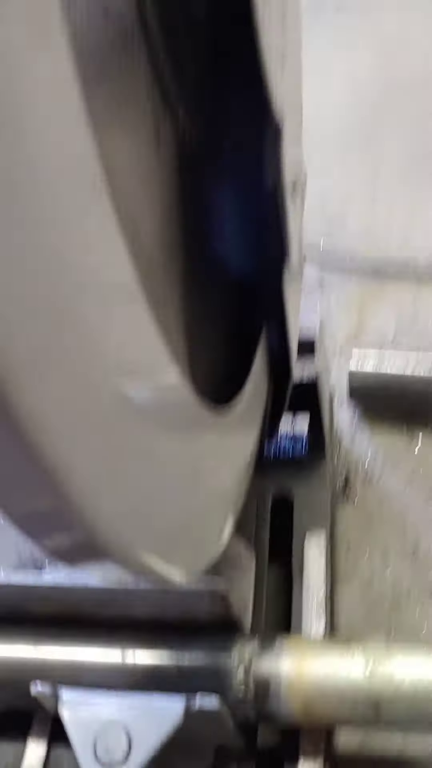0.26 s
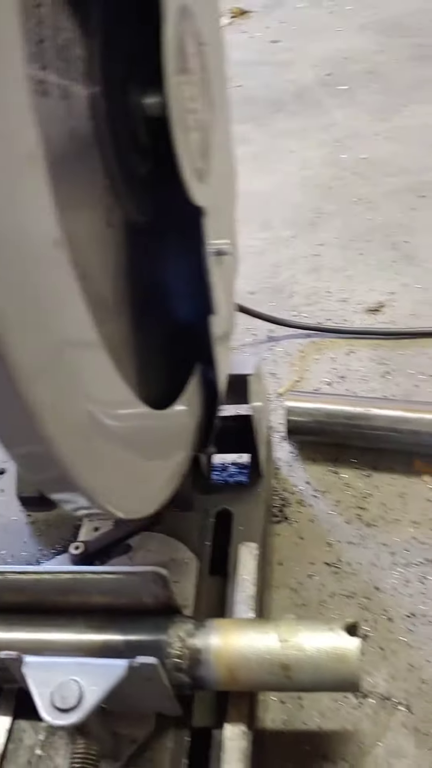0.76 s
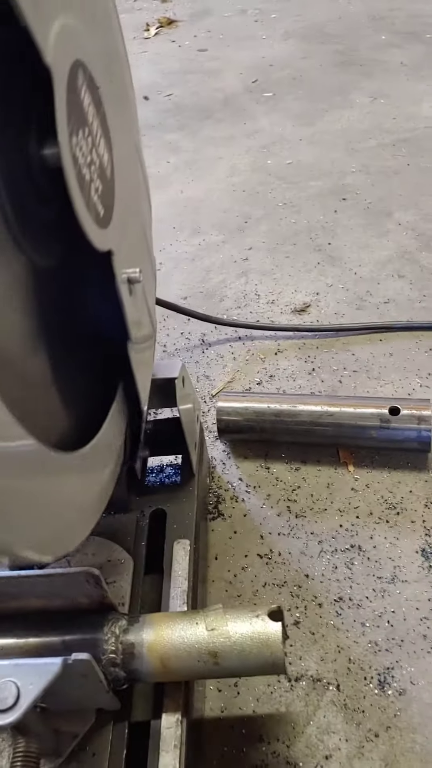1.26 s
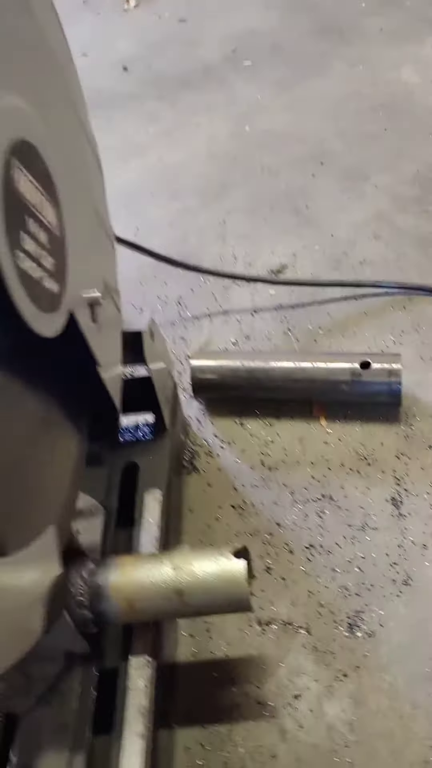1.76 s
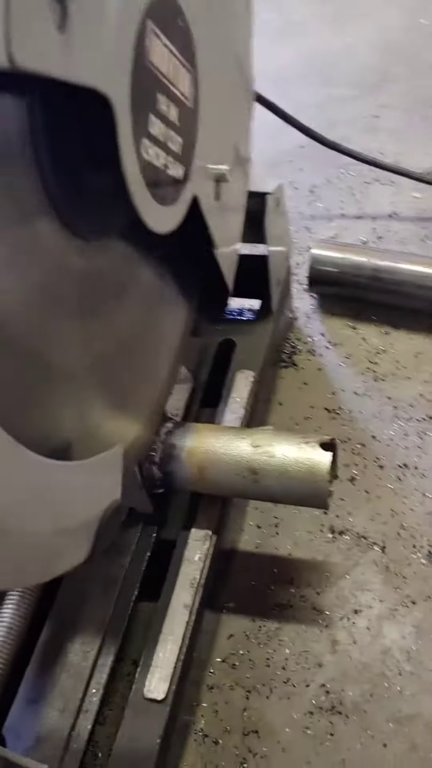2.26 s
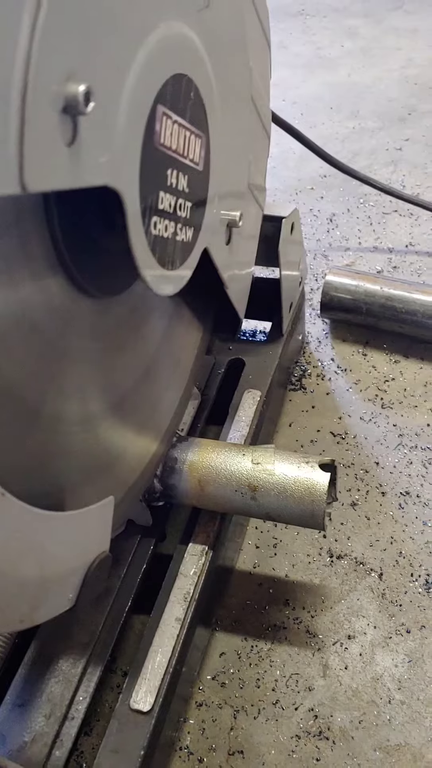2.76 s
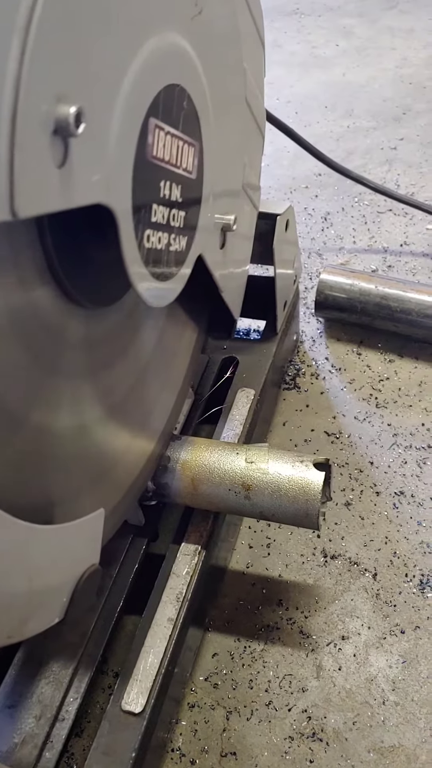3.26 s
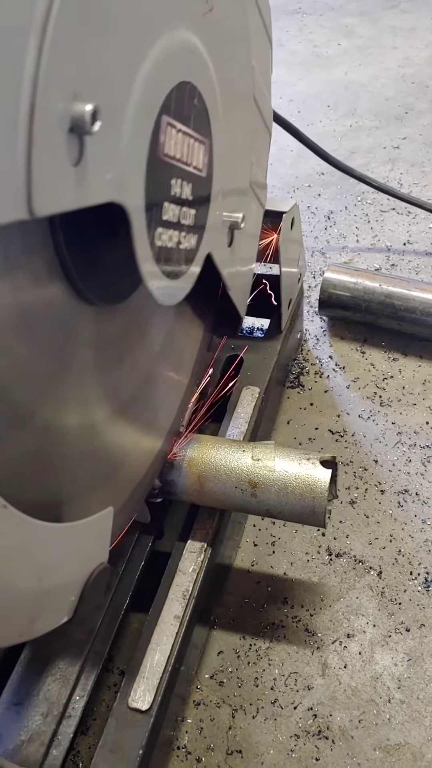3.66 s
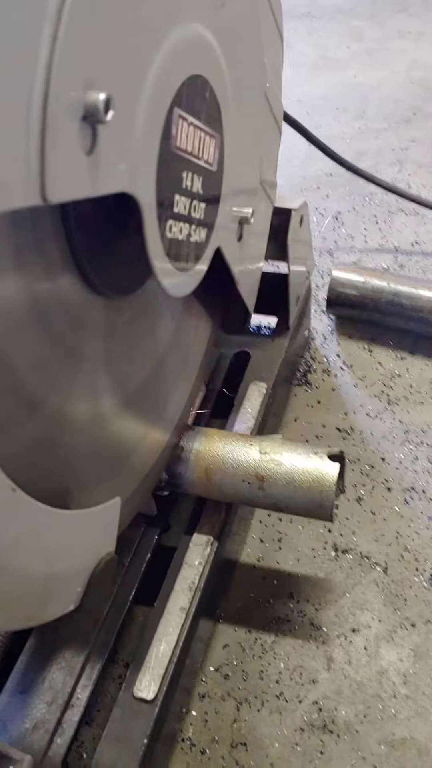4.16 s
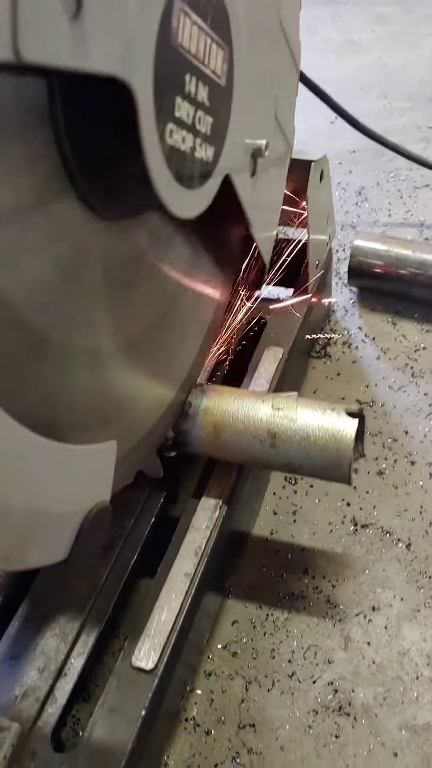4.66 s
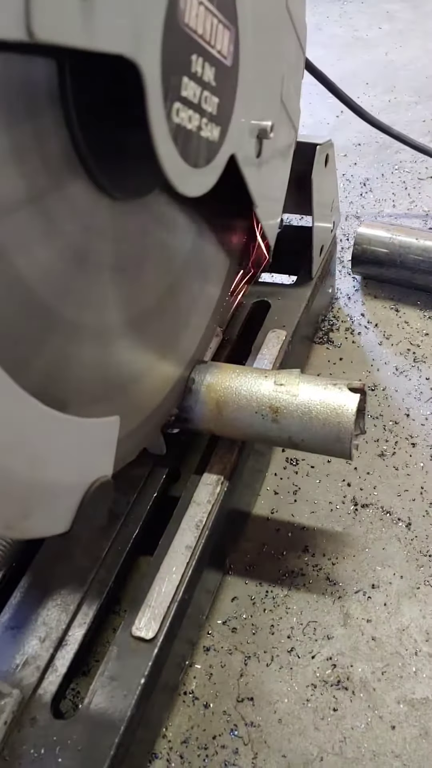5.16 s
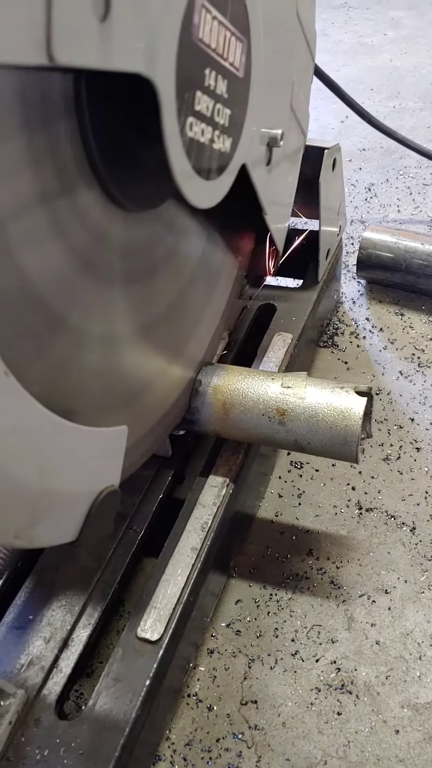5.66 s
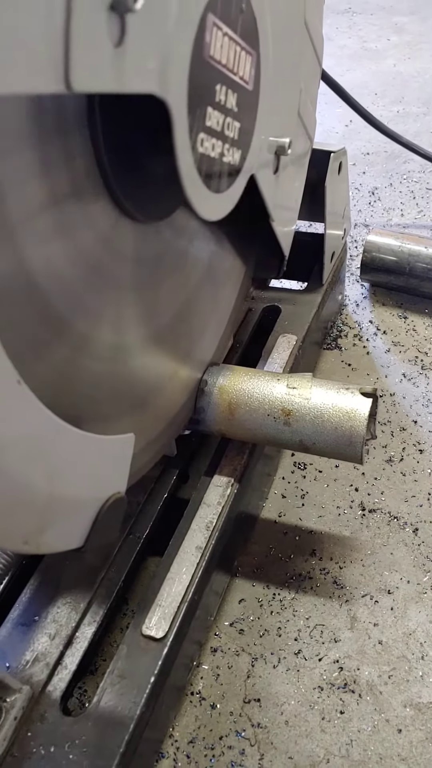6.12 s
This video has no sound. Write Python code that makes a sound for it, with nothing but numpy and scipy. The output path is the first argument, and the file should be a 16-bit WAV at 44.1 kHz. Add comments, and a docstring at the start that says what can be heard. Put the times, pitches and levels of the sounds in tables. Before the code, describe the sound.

Faint handling rumble and dry ticks, then a metal-cutting saw jolts on, whines up to speed, grazes steel and screams loudly through the tube to the end.

```python
"""Close to a dry-cut chop saw in a workshop: band-shaped noise makes a faint room tone and the rumble of fingers
on a hand-held phone, and noise bursts make dry ticks, the last the trigger. A decaying noise jolt starts the
geared motor; its sine orders whine up to speed over noise bands of roar, chatter and hiss. Soon the rim knocks
once a blade turn. The teeth graze a steel tube and the whine sags and thins. As the cut grows loud the stereo
narrows to almost mono, and noise through blade resonances screams to the end."""
import sys
import numpy as np
from scipy import signal
from scipy.fft import rfft, irfft, next_fast_len
from scipy.io import wavfile
from scipy.ndimage import uniform_filter1d, map_coordinates

SR = 44100
rng = np.random.default_rng(int(sys.argv[2]) if len(sys.argv) > 2 else 0)


def store_pcm(level_fs):
    """Save levels as 16-bit WAV."""
    pcm = np.round(np.clip(level_fs, -1, 1) * 32767).astype(np.int16)
    wavfile.write(sys.argv[1], SR, np.atleast_2d(pcm).T)


def field_ratio(decibels):
    """Amplitude ratio for a level in dB (20 dB per decade); scalars and array-likes work."""
    return 10 ** (np.asarray(decibels, dtype=float) / 20)


N = 281799
STEP = 16  # points between knots of slow curves: samples in time, bins in frequency
FREE_HZ = 384.7  # rotor turns a second without load
KNOCK_FROM_S = 1.98  # the rim starts to tap the guard


def unit(x):
    """Scales a signal to rms 1."""
    return x / np.sqrt(np.mean(x ** 2) + 1e-20)


def along(points, hz):
    """Reads (f/Hz, value) points on a log frequency axis."""
    f, v = np.transpose(points)
    return np.interp(np.log(hz + 1), np.log(f + 1), v)


def curves(rows):
    """Gives one value per sample for each column after the time."""
    s, *cols = np.transpose(rows)
    return [np.interp(np.arange(N) / SR, s, c) for c in cols]


def levels(rows, rise, fall):
    """Gain curves that fade in before the first row and out after the last (rise and fall in s)."""
    t = np.arange(N) / SR
    fade_in = np.clip((t - rows[0][0]) / rise + 1, 0, 1)
    fade_out = np.clip((rows[-1][0] - t) / fall + 1, 0, 1)
    return [field_ratio(db) * fade_in * fade_out for db in curves(rows)]


def wobble(rate):
    """A smooth random curve, rate knots a second."""
    at = np.arange(0, N + STEP, STEP)
    knots = rng.standard_normal(int(N * rate / SR) + 4)
    return np.interp(np.arange(N), at, map_coordinates(knots, [at * rate / SR]))


# How alike the two sides of a noise are: f/Hz, left-right likeness [0..1]
LIKENESS = [(700, 0.66), (1100, 0.54), (2200, 0.085), (3500, 0.19)]


def noise(spectrum, modes=(), ring_db=0, width_hz=30, patchy_db=3.5):
    """Stereo noise, its centre at rms 1, that rings the modes, with drifting patches of gain."""
    _, _, z = signal.stft(rng.standard_normal((2, N)), SR, nperseg=2048)
    field = uniform_filter1d(rng.standard_normal(z.shape[1:]), size=4, axis=0)
    field = uniform_filter1d(field, size=6, axis=1)
    pair = signal.istft(z * field_ratio(patchy_db * unit(field)), nperseg=2048)[1][:, :N]

    m = next_fast_len(N + 8192)
    hz = np.fft.rfftfreq(m, 1 / SR)
    near = hz[::STEP]
    power = np.ones(len(near))
    for centre, db in modes:
        width = width_hz * np.sqrt(centre / 2000)  # width_hz holds at 2 kHz
        power = power + field_ratio(db + ring_db) ** 2 / (1 + (2 * (near - centre) / width) ** 2)
    ringing = np.sqrt(np.interp(hz, near, power))

    side_gain = np.tan(np.arccos(np.clip(along(LIKENESS, hz), -1, 1)) / 2)
    gain = field_ratio(along(spectrum, hz)) * ringing * [np.ones(len(hz)), side_gain]
    mid, side = irfft(rfft(pair, m) * gain, m)[:, :N]
    left, right = mid + side, np.roll(mid - side, 10)  # sound reaches the right port 10 samples later
    return np.array([left, right]) / np.std((left + right) / 2)


# Spectrum of the room tone: f/Hz, relative level/dB
SHOP_SPECTRUM = [(90, -7), (150, -2), (434, -5.5), (4310, -27), (7200, -28.5), (8500, -60)]


def shop():
    """Faint steady workshop noise, stronger at the right port."""
    return field_ratio(-57 + 0.6 * wobble(7.0)) * noise(SHOP_SPECTRUM) * field_ratio([[-2.4], [2.4]])


# Fingers shifting on the phone: t/s, level/dB before the port balance
GRIP = [(0, -44), (.08, -50), (.125, -25), (.165, -21.5), (.2, -44), (.33, -53), (.5, -47), (.86, -44.5)]


def grip_rumble():
    """Fingers rub the phone's case, which passes on mostly low rumble, stronger at the right port."""
    rumble, = levels(GRIP, rise=0.01, fall=0.013)
    spectrum = [(30, -4.0), (80, -6.0), (300, -24), (1500, -48), (4000, -92)]
    return rumble * noise(spectrum) * field_ratio([[-8], [5]])


# Small dry ticks, the last the trigger: t/s, relative level/dB, relative low level/dB, relative high level/dB
HAND_TICKS = [(0.15, -19, 0, -41), (0.186, -26.5, -1, -27), (0.252, -32, -7, -15), (0.294, -29, -2, -26),
              (0.403, -35, -12, -30), (0.467, -32, -23, -20), (0.487, -24.5, -27, -18),
              (0.693, -32.5, -19, -7), (0.741, -24.5, -9, -38), (0.781, -25.5, -28, -18),
              (0.802, -26, 1, -35), (0.831, -21, -15, -25), (0.875, -22, -14, -14)]


def ticks():
    """Trigger and hand tick: short coloured bursts that ring small steel parts near 3.9 kHz."""
    t = np.arange(SR // 10) / SR
    hz = np.fft.rfftfreq(len(t), 1 / SR)
    steel = 1 + field_ratio(4.5) / (1 + ((hz - 3930) / 250) ** 2)
    decay = field_ratio(-60 * t / 0.022) + field_ratio(-17.0 - 60 * t / 0.27)  # tick, then the shop's answer (T60 in s)
    out = np.zeros((2, N + len(t)))
    for s, db, low_db, high_db in HAND_TICKS:
        spectrum = [(150, -21), (700, low_db + 15.5), (3800, -9.5), (6500, high_db), (9000, high_db - 30)]
        colour = field_ratio(along(spectrum, hz)) * steel
        burst = unit(irfft(rfft(rng.standard_normal((2, len(t)))) * colour))
        start = round(s * SR)
        out[:, start:start + len(t)] += field_ratio(db - 10.5) * burst * decay * field_ratio([[-2.2], [2.2]])
    return out[:, :N]


def rotor_speed():
    """Rotor turns a second: a long-tailed run-up to free speed, then a sag as the teeth touch."""
    t = np.arange(N) / SR
    start_s, run_up_s, shape = 0.892, 0.3217, 0.613
    load_s, sag_hz_per_s, sag_s = 3.25, 30, 1.1
    run_up = (np.clip(t - start_s, 0, None) / run_up_s) ** shape
    return FREE_HZ * (1 - np.exp(-run_up)) - sag_hz_per_s * np.clip(t - load_s, 0, sag_s)


def rotor_turns():
    """Turns made by the rotor up to each sample."""
    return np.cumsum(rotor_speed()) / SR


def blade_turns(turns):
    """The gear turns the blade once for 14 rotor turns."""
    return turns / 14


def blade_throb(turns):
    """The running blade throbs once a turn."""
    return np.cos(2 * np.pi * blade_turns(turns))


def running():
    """The motor's noise switches on, then is turned down quickly by the phone from 3.53 s."""
    t = np.arange(N) / SR
    on_s, turn_down_s, turn_down_db_per_s = 0.885, 3.53, 182
    switch_on = np.clip((t - on_s) / 0.012 + 1, 0, 1)
    return switch_on * field_ratio(-turn_down_db_per_s * np.maximum(t - turn_down_s, 0))


# Resonances of the blade guard: f/Hz, level/dB over the broad spectrum before each layer's ring_db
GUARD_MODES = [(420, 3.5), (510, 12), (910, 8.5), (1000, 9), (1440, 7), (2880, 15.5), (4620, 12)]


def start_jolt():
    """The start jolts the guard into a rattle that dies by 32 dB a second."""
    t = np.arange(N) / SR
    since = t - 0.88
    jolt = (since > 0) * field_ratio(-9.5 - 32 * since + 1.8 * wobble(60))
    spectrum = [(250, -15.5), (400, 6.5), (520, -8.5), (1500, -5.5), (2000, -53)]
    return jolt * noise(spectrum, GUARD_MODES, ring_db=5.5, width_hz=75, patchy_db=0.6)


# Brush noise spectrum: f/Hz, relative level/dB
BRUSH_SPECTRUM = [(2600, -5.5), (3400, 3), (5400, -3), (6640, 5.5), (7780, -13), (10700, -7), (11800, -16)]
# Brushes chattering, worst in the run-up: t/s, level/dB before flutter
CHATTER_LEVEL = [(.91, -33.5), (1.15, -29), (1.74, -26), (1.82, -42), (3.5, -33.5)]
# Resonance of the brush holders: f/Hz, level/dB over the hiss
HOLDER_MODES = [(6570, 15)]


def brush_chatter():
    """Brushes chatter in their holders and ring them."""
    chatter = levels(CHATTER_LEVEL, rise=0.017, fall=0.085)[0] * field_ratio(2.8 * wobble(75))
    return chatter * noise(BRUSH_SPECTRUM, HOLDER_MODES, width_hz=94)


# Brush hiss before flutter and the turning down: t/s, level/dB
HISS_LEVEL = [(.885, -31), (1.15, -22.5), (1.75, -22), (1.85, -23.5), (3.2, -21)]


def brush_hiss_and_knock(turns):
    """The brushes hiss in bursts; later the rim also taps the guard once a blade turn."""
    t = np.arange(N) / SR
    hiss = running() * field_ratio(curves(HISS_LEVEL)[0])
    flutter = field_ratio(0.47 * blade_throb(turns) + 1.4 * wobble(90))
    brushes = flutter * noise(BRUSH_SPECTRUM, GUARD_MODES, ring_db=-7.5, width_hz=420, patchy_db=4.0)

    since_tap = (blade_turns(turns) + 0.15 * wobble(5.9)) % 1  # in turns, with uneven timing
    knock = (t > KNOCK_FROM_S) * field_ratio(3 - 30 * since_tap + 1.4 * wobble(16))  # falls 30 dB over one turn
    spectrum = [(700, -30), (1800, 1), (2900, 18), (6000, -12), (9000, -26)]
    taps = knock * noise(spectrum, GUARD_MODES + [(2420, 7.6)], width_hz=110, patchy_db=-1.3)
    return hiss * (brushes + taps)


# Roar of fan and gears: f/Hz, relative level/dB
ROAR_SPECTRUM = [(25, -39), (150, -17.5), (454, -3.5), (700, -1.5), (1500, -3), (2400, -11.5), (3600, -24),
                 (4700, -32)]


def motor_roar(turns):
    """Fan and gears roar in the guard, 3 dB louder per octave of rotor speed above 70 turns a second."""
    t = np.arange(N) / SR
    octaves = np.log2(np.maximum(rotor_speed(), 70) / FREE_HZ)
    roar = running() * field_ratio(-15.5 + 3 * octaves)
    throb = blade_throb(turns) * (t > KNOCK_FROM_S)  # heard once the rim taps
    flutter = field_ratio(1.26 * wobble(12) + 1.34 * throb)
    return roar * flutter * noise(ROAR_SPECTRUM, GUARD_MODES, ring_db=-2.0, width_hz=21, patchy_db=3.5)


# Tones per rotor turn, one of them the mesh of the 7 pinion teeth, the last the commutator [cycles per turn]
TONE_ORDERS = [1, 2, 3, 4, 5, 7, 30]
# Each order away from resonances, before the fade of all tones: level/dB
TONE_LEVEL_DB = [-24.5, -26, -31, -48.5, -38.5, -33.5, -44]
# Left-minus-right part of each order against its centre part, before drift: level/dB
TONE_SIDE_DB = [-4, -2, -1, -4, 5, 7, 1.5]
# The whine thins under load: t/s, relative level/dB
TONE_FADE = [(.96, -19), (1.03, 0.5), (3.1, 2.5), (3.55, -8), (3.9, -6.5), (4.3, -16)]
# Housing resonances that the tones sweep through: f/Hz, width/Hz, level/dB
HOUSING_MODES = [(306, 100, 6.5), (362.3, 6.5, 11.5), (604, 22, 10), (738, 15, 6), (861, 62, 16),
                 (997, 48, 18.5), (1065, 22, 13), (1320, 91, 16), (1502, 85, 15.5), (1664, 670, 10.5),
                 (2000, 54, 12), (2234, 40, 12), (10440, 270, 12)]
# How well the housing radiates: f/Hz, relative level/dB
RADIATION = [(150, -26), (260, -4.5), (700, -3.5), (1200, 1), (2300, -1.5), (2600, -10), (9200, -16),
             (11000, 3.5)]


def whine(turns):
    """Unbalance, gear and commutator tones cross housing resonances; walls shift their phase between ports."""
    out, speed, grid = 0, rotor_speed(), np.arange(12000.)
    power = 1
    for centre, width, db in HOUSING_MODES:
        power = power + field_ratio(db) ** 2 / (1 + (2 * (grid - centre) / width) ** 2) ** 2
    housing = field_ratio(along(RADIATION, grid)) * np.sqrt(power)
    fade, = levels(TONE_FADE, rise=0.03, fall=0.042)

    for k, db, side_db in zip(TONE_ORDERS, TONE_LEVEL_DB, TONE_SIDE_DB):
        torque = (k == 7) * (1 - speed / FREE_HZ)  # the mesh is louder and rougher while the rotor is slow
        gain = fade * field_ratio(db + 3 * torque)
        swell = np.interp(k * speed, grid, housing)
        phase = 2 * np.pi * k * turns + 0.15 * min(k, 7) * wobble(60) + 2.3 * torque * wobble(240)
        flutter_db = min(k, 8) * (0.31 * wobble(50) + 0.31 * (1 - torque) ** 4 * wobble(16))
        mid = gain * swell * field_ratio(flutter_db) * np.sin(phase)
        side_gain = gain * swell ** 0.86 * field_ratio(side_db + 3.2 * wobble(5.49))
        side = side_gain * np.sin(phase + 1.3 + 0.9 * wobble(2.72))
        out = out + np.sqrt(2) * np.array([mid + side, mid - side])
    return out


# Hand pressure on the saw head, scaled by each layer's share: t/s, level/dB
FEED_PRESSURE = [(4.24, -2.5), (4.5, 2), (4.8, -5), (4.95, -3.5), (5.2, 0), (5.5, -.5), (6.39, -0.2)]


def layer(steady_db, share, skin_db, entry_db_per_s):
    """Gain of one cutting layer: it enters with the plunge, follows the feed and shifts as the skin breaks."""
    t = np.arange(N) / SR
    skin = np.exp(-((t - 4.28) / 0.36) ** 2)  # breaking the tube's skin
    entry_db = entry_db_per_s * np.minimum(t - 4.207, 0)  # until full depth is reached
    return field_ratio(steady_db + share * curves(FEED_PRESSURE)[0] + skin_db * skin + entry_db)


# Blade resonances: f/Hz, level/dB over the broad spectrum before each layer's ring_db
BLADE_MODES = [(1250, 4.2), (1790, 9.3), (2198, 12.1), (2470, 7.6), (2643, 9.7), (2950, 8.2), (3162, 6.8),
               (3429, 8.7), (3956, 13.2), (4037, 13.9), (4347, 11), (4635, 9.6), (4690, 7.6), (4740, 8.5),
               (4834, 4.1), (4972, 8.5), (5510, 8.9), (5965, 7.4)]
# Teeth grazing the tube: t/s, level/dB
BITE_LEVEL = [(3.35, -19), (3.62, -12.5), (3.85, -11.5), (4.12, -11), (4.2, -17)]
# Spectrum of the grazing teeth: f/Hz, relative level/dB
GRAZE_SPECTRUM = [(30, -27), (244, -21.5), (500, -5.5), (2000, -7.5), (2310, -14), (2940, -6),
                  (3450, -12.5), (3700, -15.5), (5910, -29.5), (11100, -41)]
# Spectrum of the shaking bench: f/Hz, relative level/dB
BENCH_SPECTRUM = [(18, -38), (40, -0.5), (700, -1), (1700, -3), (2600, -29.5)]
# Spectrum of the screaming blade: f/Hz, relative level/dB
SCREAM_SPECTRUM = [(1100, -23), (1700, -5), (2500, -7.5), (3070, -2.5), (3700, -5), (4780, -1),
                   (6130, -3.5), (7800, -27), (9500, -46)]
# Spectrum of the hissing chips: f/Hz, relative level/dB
CHIP_SPECTRUM = [(6000, -7), (7300, 5), (8510, -8), (9830, 3), (11500, 8), (12000, 3), (13200, -25),
                 (15400, -21)]


def cutting():
    """Teeth strike too fast to count and ring the blade; the bench shakes; chips hiss off the rim."""
    bite, = levels(BITE_LEVEL, rise=0.54, fall=0.45)
    modes = BLADE_MODES[:8] + GUARD_MODES[2:5]
    graze = bite * noise(GRAZE_SPECTRUM, modes, ring_db=5.5, width_hz=6, patchy_db=2.3)

    rumble = layer(steady_db=-17, share=0.76, skin_db=-6.5, entry_db_per_s=320)
    bench = rumble * noise(BENCH_SPECTRUM, BLADE_MODES)

    feed = wobble(24)
    feed = np.tanh(feed - uniform_filter1d(feed, size=SR // 8))  # uneven hand pressure and tooth load
    ring = layer(steady_db=-13, share=0.92, skin_db=-1, entry_db_per_s=62) * field_ratio(0.56 * feed)
    scream = ring * noise(SCREAM_SPECTRUM, BLADE_MODES, ring_db=0.5, width_hz=7.7, patchy_db=1.8)

    breaking = layer(steady_db=-37.5, share=-1, skin_db=23.5, entry_db_per_s=95)
    spectrum = [(2500, -23), (3000, 6), (3600, -8.5), (4950, 5.5), (6300, -19.5)]
    squeal = breaking * noise(spectrum, BLADE_MODES, ring_db=4.5, width_hz=11)

    hissing = layer(steady_db=-28, share=0.4, skin_db=3.5, entry_db_per_s=85) * field_ratio(0.67 * wobble(120))
    chips = hissing * noise(CHIP_SPECTRUM, patchy_db=4.5)
    return graze + bench + scream + squeal + chips


# The hand shades the ports: f/Hz, left over right level/dB
HAND_SHADOW = [(1500, -2), (5000, 1.5), (8100, 29), (11000, -2)]


def shade_ports(saw):
    """The hand around the phone colours left and right differently at a constant summed power."""
    m = next_fast_len(N)
    tilt = field_ratio(along(HAND_SHADOW, np.fft.rfftfreq(m, 1 / SR)))
    ports = np.array([tilt, np.ones_like(tilt)]) * np.sqrt(2 / (1 + tilt ** 2))
    return irfft(rfft(saw, m) * ports, m)[:, :N]


def scene():
    """The shaded saw, the handling and the shop together."""
    turns = rotor_turns()
    motor = start_jolt() + brush_chatter() + brush_hiss_and_knock(turns) + motor_roar(turns)
    saw = shade_ports(motor + whine(turns) + cutting())
    return shop() + grip_rumble() + ticks() + saw


# Gain of the left-minus-right part: t/s, level/dB
STEREO_WIDTH = [(3.45, -2), (3.7, -17.5), (4.1, -18.5), (4.3, -34.5), (4.7, -45)]


def narrow_stereo(x):
    """The phone's two channels merge almost into one along a set curve."""
    mid = (x[0] + x[1]) / 2
    side = (x[0] - x[1]) / 2 * field_ratio(curves(STEREO_WIDTH)[0])
    return np.array([mid + side, mid - side])


def band_limit(x):
    """A steep low-pass at the top of the band."""
    return signal.sosfilt(signal.butter(12, 15590, fs=SR, output="sos"), x)


def record(dry):
    """The phone narrows the stereo and rounds off the peaks."""
    mix = narrow_stereo(dry)
    mix = mix / (1 + np.abs(mix / 1.05) ** 6) ** (1 / 6)
    return band_limit(mix)


dry = scene()
out = record(dry)
store_pcm(out)
```